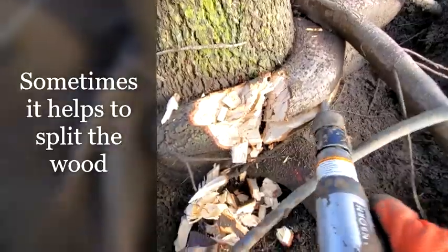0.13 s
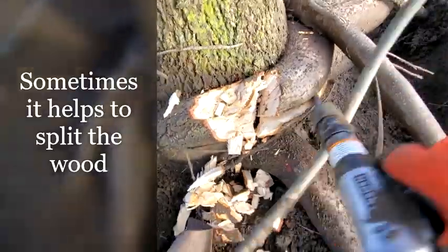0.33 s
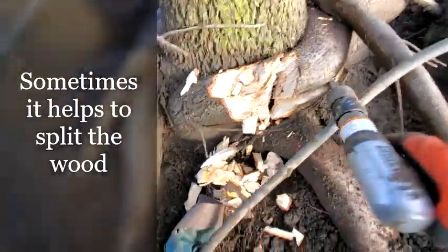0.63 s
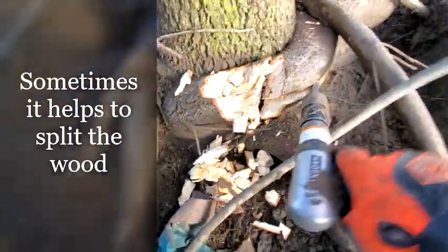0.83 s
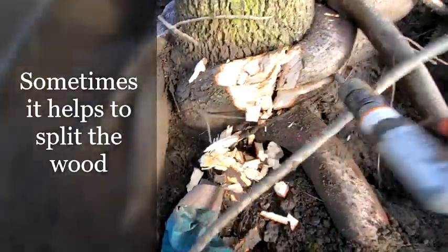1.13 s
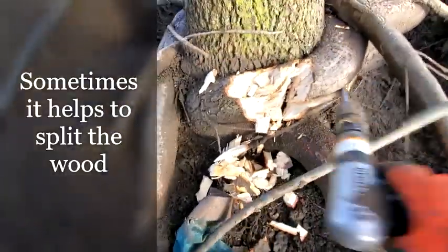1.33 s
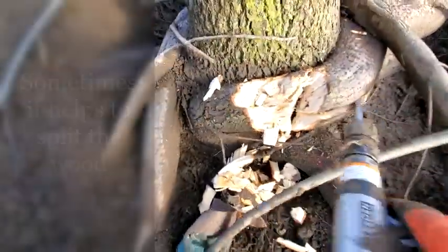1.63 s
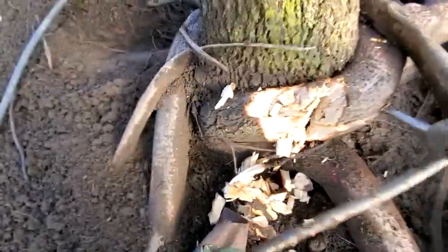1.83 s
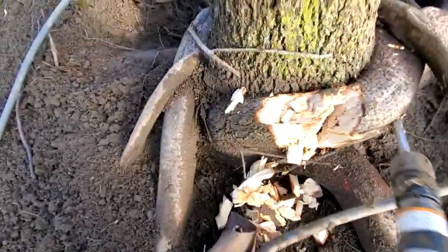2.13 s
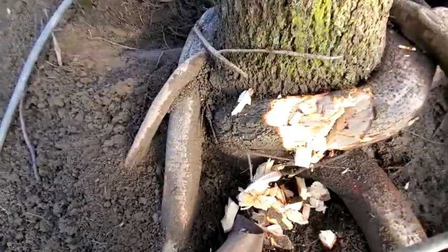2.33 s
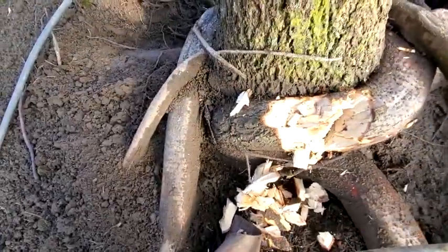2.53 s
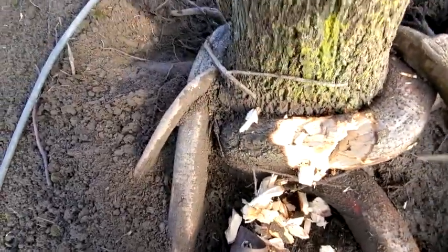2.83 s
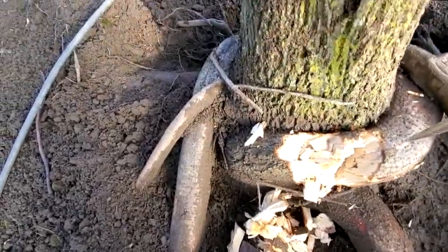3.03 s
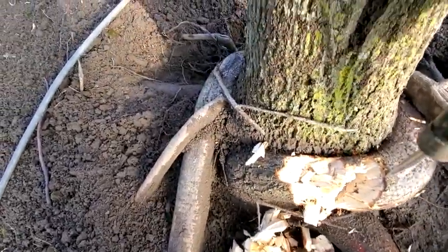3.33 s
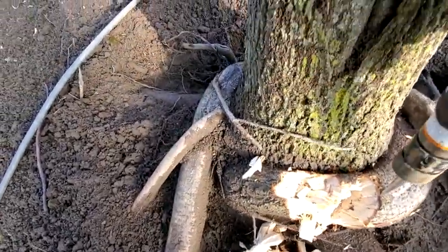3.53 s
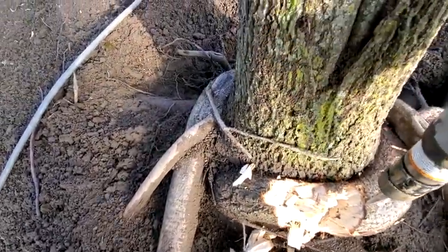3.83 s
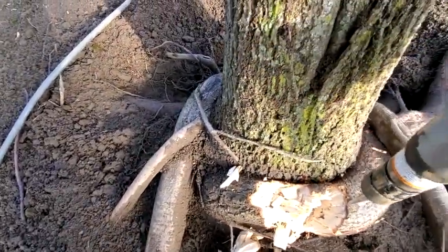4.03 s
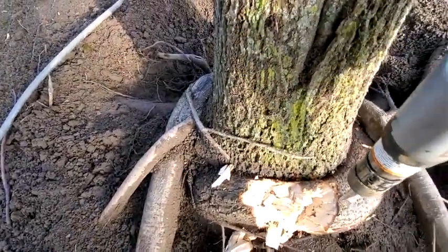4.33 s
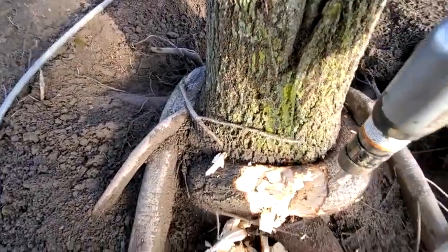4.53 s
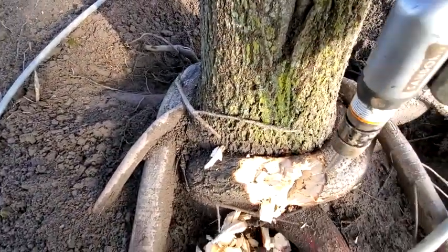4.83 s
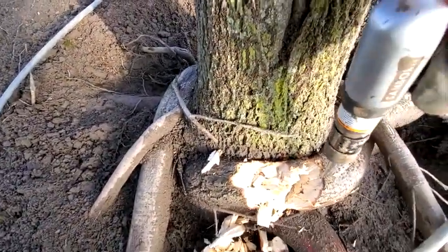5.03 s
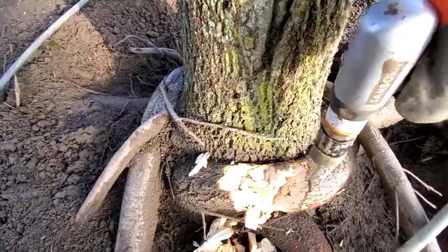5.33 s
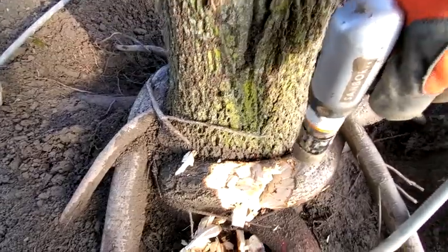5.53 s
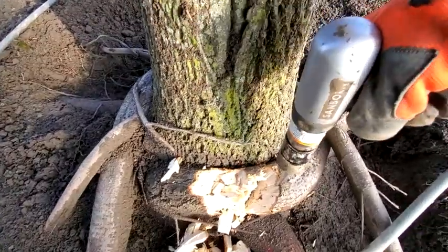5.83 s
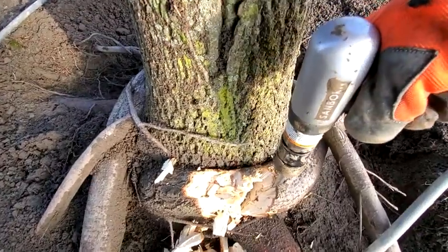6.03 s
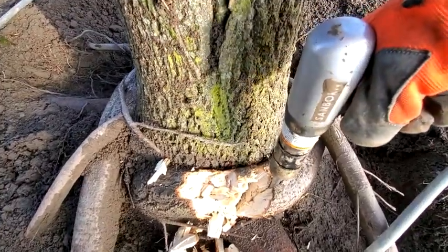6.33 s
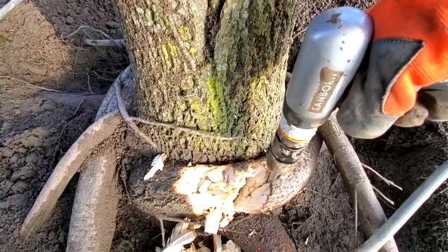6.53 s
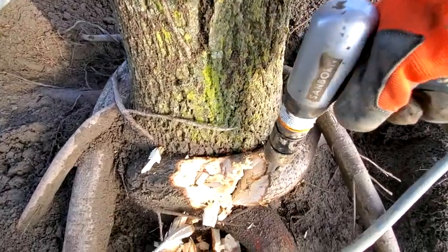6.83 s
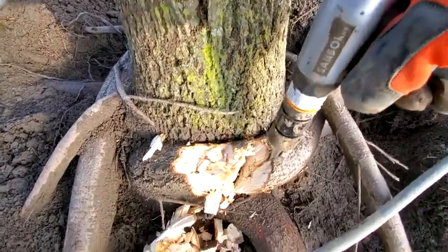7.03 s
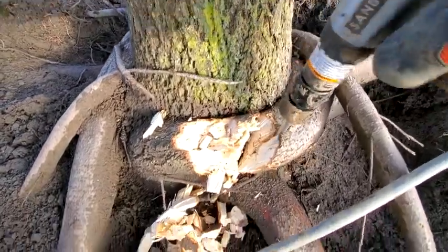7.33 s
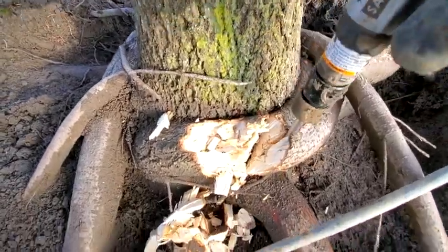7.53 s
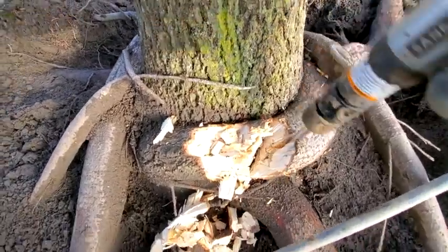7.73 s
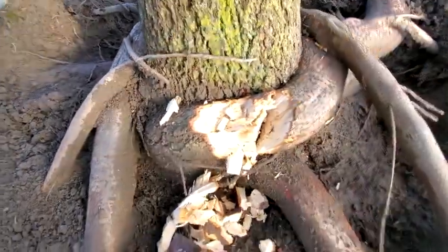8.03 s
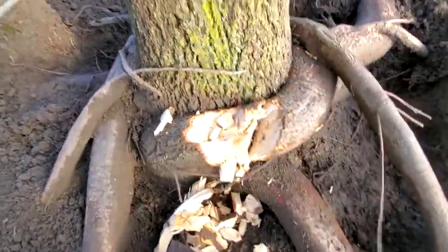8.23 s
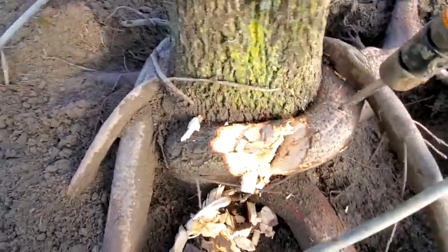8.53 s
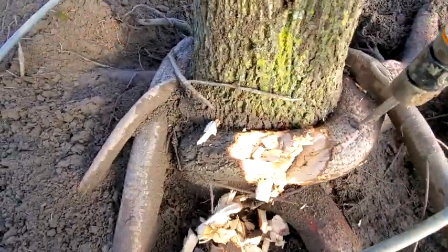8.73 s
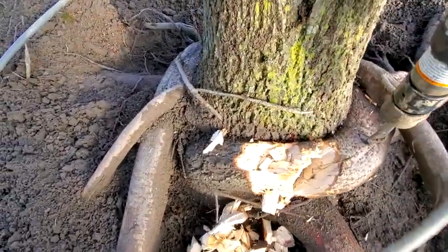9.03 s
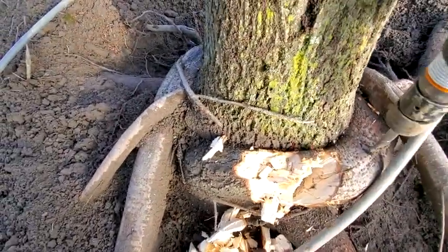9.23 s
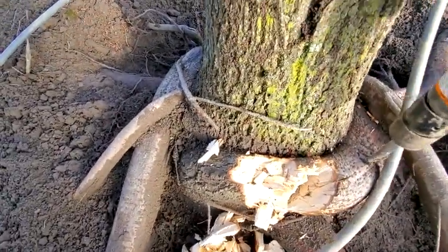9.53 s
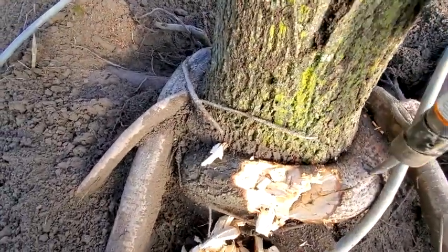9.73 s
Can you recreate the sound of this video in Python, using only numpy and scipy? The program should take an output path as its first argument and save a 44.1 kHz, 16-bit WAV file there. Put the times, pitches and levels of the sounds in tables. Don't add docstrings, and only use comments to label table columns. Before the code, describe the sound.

A close compressor hums and whines; a brief chisel burst, then a long hammering run into wood, a clattering release and another burst.

```python
import sys
import numpy as np
from scipy import signal
from scipy.fft import rfft, irfft, next_fast_len
from scipy.io import wavfile

SR = 44100
rng = np.random.default_rng(int(sys.argv[2]) if len(sys.argv) > 2 else 0)


def ratio_of_db(decibels):
    return 10 ** (np.asarray(decibels, float) / 20)


def master(y):
    cut = np.clip(np.atleast_2d(y).T, -1, 1)
    pcm = np.round(cut * 32767)
    wavfile.write(sys.argv[1], SR, pcm.astype(np.int16))


N = 436590

# t/s, turning rate/Hz
SHAFT = [(0, 55.98), (2, 56.08), (5.5, 56.17), (8.2, 56.06), (9.9, 56.15)]
# f/Hz, wander/Hz, level/dB re drone
GEAR_TONES = [(219, 4.0, -21), (168, 3.0, -28), (565, 2.0, -26.5), (1130, 2.5, -31.5), (995, 5.0, -35)]
# f/Hz, width/Hz, level/dB re drone, change when turned away/dB
HOLLOWS = [(977, 53, -29, 1), (176, 140, -19.5, -0.9), (1906, 100, -37, 7), (2040, 310, -26.5, -4.5)]
# t/s, level/dB
DRONE = [(0, -19.5), (.65, -20.5), (.8, -19), (1.08, -12.5), (1.4, -14), (1.8, -12.5), (4.64, -12.5),
         (4.69, -24), (5.2, -28), (7.05, -29), (7.14, -22.5), (7.27, -21.5), (7.85, -22), (8.15, -21.5),
         (8.55, -12), (9.63, -12), (9.7, -36), (9.9, -31)]
# t/s, level/dB re drone, turned/0-1
DRAUGHT = [(0, -22, 0), (.3, -22, 0), (1.1, -21, 0), (1.4, -21.5, 0.04), (2.5, -21, 0), (2.9, -21.5, 0.5),
           (3.3, -25, 0.68), (4.64, -25.5, 0.97), (7.14, -24.5, 0.1), (7.5, -24, 0.03), (8.2, -20.5, 0.04),
           (8.7, -23.5, 0.28), (9.9, -24.5, 0.17)]
# t/s, level/dB
WHINE = [
    [(0, -57), (.34, -53.5)],
    [(.53, -66), (1.05, -54), (1.3, -58), (1.85, -51.5), (2.45, -58), (3.1, -49.5), (3.55, -47.5),
     (3.8, -43.5), (3.95, -51), (4.15, -47), (4.63, -49.5)],
    [(7.34, -63), (7.5, -58), (7.82, -57), (7.9, -61), (8.12, -63), (8.23, -53), (8.4, -54.5), (8.7, -50),
     (9.0, -56.5), (9.63, -52)],
]
# t/s, squeak/dB re drone, throb of the whine/dB
REED = [(0, -28, 2), (2.8, -28, 2), (3.4, -26, 1.5), (3.8, -25, .8), (3.95, -27, 2.5), (4.1, -23, 5),
        (4.35, -22, 2.5), (4.45, -27, 2), (4.6, -24, 2.5), (7.3, -28, 1.5), (7.8, -30, 1.5), (7.95, -20, 3),
        (8.05, -28, 3), (8.3, -25, 2), (8.7, -27, 4.5), (8.95, -29, 2), (9.9, -29, 2.5)]
# f/Hz, level/dB per Hz
RUMBLE = [(76, -15), (130, -14), (163, -6.5), (227, -13.5), (435, -28), (560, -20), (726, -23),
          (987, -24.5), (1200, -40), (1560, -76), (2640, -120)]
RUSH = [(590, -0.5), (1000, -5), (1150, 5.5), (1190, 0.5), (1410, 4), (2060, -4), (2810, 0), (3100, -4.5),
        (4440, -5.5), (7000, -18.5), (9100, -53), (15400, -120)]
HISS = [(3240, 0.5), (5500, 1.5), (6890, -4), (7460, -5.5), (9180, -1), (13700, -4.5), (15100, -3),
        (15800, -19)]
# f/Hz, width/Hz
GROUND_DIPS = [(1550, 1360), (1186, 140)]
# f/Hz, level/dB, t60/s
RATTLE = [(2510, 6, 0.0021), (4100, -20, 0.01), (5300, 5.5, 0.0044), (8700, 6, 0.0039)]
# t/s, peak level/dB
GRIT = [(0.3508, -23), (0.82, -22), (1.1677, -29), (2.402, -17), (.397, -27), (.403, -19), (0.407, -24),
        (3.516, -24), (3.525, -27), (4.6555, -19), (4.6584, -8.5), (4.6615, -13), (7.0764, -25),
        (7.1063, -7), (7.431, -32), (7.46, -29), (7.481, -28), (7.883, -24.5), (7.9824, -37),
        (8.049, -18.5), (8.064, -23), (9.640, -11), (9.644, -8), (9.6482, -18)]
# t/s, peak level/dB, centre f/Hz
CHIPS = [(.843, -35, 13600), (1.325, -28.5, 9600), (2.386, -34, 7940), (3.4355, -36, 11000),
         (3.4834, -27.5, 10000), (3.512, -41, 2100), (3.522, -38, 2600), (3.533, -28.5, 5100),
         (3.485, -36, 15500), (3.549, -36, 9050), (7.116, -33, 11600), (7.459, -35, 9050),
         (7.974, -35.5, 8500), (8.08, -27, 13900), (8.182, -35.5, 9090), (8.503, -30, 9650),
         (9.048, -36, 8750), (9.643, -19, 9650)]
# t/s, peak level/dB, f/Hz
THUDS = [(.001, -27, 300), (.409, -14.5, 225), (.444, -16, 225), (.486, -16, 260), (4.641, -17, 245),
         (4.657, -18, 245), (7.104, -22, 245), (7.947, -25, 340), (7.957, -26, 250), (9.64, -18, 245)]
# multiple of its pitch, level/dB, t60/s
THUD_PARTIALS = [(1, 4, 0.03), (3.1, -2.5, 0.013)]
# f/Hz, level/dB, t60/s
HOLDER = [(1300, -26, .006), (2320, -12, 0.015), (3550, 5, 0.009), (4800, -17, 0.0054), (6100, -2, 0.0076),
          (6400, -14, 0.0045), (9500, -4, .005), (11500, -16, .004)]
# t/s, exhaust air level/dB, blade depth/0-1
TRIGGER = [
    [(.39, -35, 0.3), (.405, -31, 1), (.44, -40, 1), (.495, -41, 0.8)],
    [(4.635, -35, 0.2), (4.66, -30.5, 0), (4.85, -31, 0.22), (5.1, -34.5, 0.15), (5.35, -35, 0.76),
     (6.4, -33.5, 0.89), (6.7, -32, 0.98), (7.0, -33.5, 1), (7.1, -38, 1)],
    [(9.64, -27, 1), (9.67, -31, 0.8), (9.75, -37, 0.54), (9.84, -34, 0.3), (9.9, -34.5, 0.9)],
]
# t/s, level/dB
HALF_OPEN = [
    [(.372, -32), (.385, -27), (.44, -39), (.5, -44), (.525, -48)],
]
# f/Hz, level/dB per Hz
EXHAUST = [(410, 6.5), (700, 0.5), (1280, -4.5), (1580, -9.5), (1970, -7), (2240, -5), (2990, 3.5),
           (3280, 2), (4380, 2), (5400, 1.5), (5840, -1.5), (8100, -6), (11000, -6.5), (16000, -17)]
# f/Hz, width/Hz, level/dB re exhaust
OPEN_CUT = (4600, 980, 0)
# t/s, blow force/dB, lean on handle/dB, freedom of shank/dB, grip of wood/dB
HAND = [
    [(.41, -18, 4, -15, 3), (.49, -21, 4.5, -9, 7)],
    [(4.67, -16.5, -2.5, 9, 1), (4.8, -13.5, -1.5, 1, 1), (4.95, -14, -1.5, -1, 2.5), (5.2, -17, 1.7, 4, 5),
     (5.5, -16.5, 0.5, -1, 0.9), (5.8, -18, 2.5, 2, 1), (5.97, -14, 1, -2, -1), (6.15, -18, 3, 2.1, 1),
     (6.4, -23, 5, 1, 6.5), (6.55, -19, 4.5, 1, 3), (6.68, -17, 4.5, -1, 3), (6.82, -20, 3.5, 4, 3.5),
     (6.93, -20.5, 4.5, 1.1, 5), (7.06, -19, 3.5, -6, 3)],
    [(9.65, -19, -5, 23, 7), (9.73, -21.5, -2, 18.5, 11), (9.88, -21.5, -0.5, 14, 13)],
]
# t/s, crack level/dB, clank level/dB, both re hand
BLOWS = [(0.4149, 3.0, -8), (0.4489, 1, -1), (0.4906, 2.0, -3), (4.6706, 3, 0.5), (4.6984, -1, 4),
         (4.7269, -4.5, -9), (4.7545, 0, -2.0), (4.7821, -3, 7), (4.8111, 0.5, 0), (4.8393, 1.5, 6),
         (4.8675, -5, -3), (4.8949, 0.5, 1.5), (4.9238, 2.5, 2), (4.9529, -1, 2), (4.9815, -2.0, 2),
         (5.0117, -4, -4.0), (5.0406, -2.5, 2), (5.0689, 1, 3.5), (5.098, -1, 2), (5.1273, -0.5, 3.0),
         (5.1563, -5, -6), (5.1858, -4, 0), (5.215, -3, 1), (5.2446, 0, 1.5), (5.2742, 0.5, 2),
         (5.3042, 1.0, 1), (5.3338, 2.5, 3), (5.3637, 0, -2), (5.394, 1.5, 3.5), (5.4239, -0.5, -1.5),
         (5.4544, -0.5, 1.0), (5.4844, -3, -0.5), (5.5146, 1, -1.5), (5.5446, 2, 2), (5.5747, 2, 3.5),
         (5.6049, -2, -2.0), (5.6351, -0.5, 2), (5.6653, 2.0, 1.5), (5.6958, 1.5, 3),
         (5.726, 3.5, 4.5), (5.7565, -2, 1.5), (5.7868, 1, 2.5), (5.8171, -1.0, 0.5),
         (5.847, -1.0, 0), (5.8775, -2, 3),
         (5.9082, 0, 2), (5.9382, 2.5, 4), (5.9687, -1.5, 2.5), (5.9994, 0.5, 2.5), (6.0292, 0.0, 1.5),
              (6.06, 1.5, 1.0), (6.0906, -3, -5), (6.1206, 3.5, 2), (6.1513, 1, 1.5), (6.1821, -2.0, -3.5),
              (6.2131, 0.0, -2), (6.2434, 4, -0.0), (6.2739, 2, -2.5), (6.3047, 3, -0.5), (6.3353, 0.5, -5),
              (6.3655, 2, -2.0), (6.3961, -0.5, -6), (6.4267, 1, -5), (6.4571, 2, -2), (6.4875, -2.5, -0.5),
              (6.5183, -1, 0.0), (6.5484, 0.5, 0), (6.5781, -2.5, 0.5), (6.6084, 1, 2.5),
              (6.6387, -0.5, 2.5), (6.6682, -0.5, 2), (6.6981, -0.5, 0.5), (6.7282, 2.0, 0),
              (6.7584, 0.5, 0.0), (6.7893, -3, -6), (6.8195, -0.0, 1.5), (6.8498, 1.5, 2), (6.88, 2.5, 1),
              (6.9105, 3.5, 4), (6.9404, 0, 2), (6.9702, 2, 0.5), (7.001, 1.5, -0.0), (7.0311, 5, 2.5),
              (7.0623, 4.0, 4.5), (9.6523, 0, -10), (9.6777, 3.5, -1), (9.7015, -5, -4), (9.7264, -1, -2),
              (9.7507, 2, 0), (9.7752, -3, -2), (9.8006, -0.0, -10), (9.8256, 2, -3), (9.8506, 2, -1),
              (9.8752, -1, -1)]
OWN_SCATTER_DB = [.2, .2, .6, 1.2]
LEAN_SHARE = [0.13, 1.04, 0.21, 1.1]
# f/Hz, level/dB per Hz
CRACK = [(4500, 4.5), (6000, 3), (7400, -1), (8800, 7.5), (10600, 7.5), (11300, 4.5), (14000, 4.5),
         (16000, -28)]
CLANK = [(700, -65), (1100, 4), (1600, 5), (2300, 14), (3000, 10), (4100, 8.5), (5200, -10), (6500, 7)]
# f/Hz, width/Hz
CLANK_GAP = (2110, 1340)
# delay after blow t/s, level/dB
REBOUNDS = [(.0022, -6), (.0052, -15)]
# f/Hz, level/dB, t60/s
CHISEL = [(15800, 15, 0.0058), (14900, -11, 0.01), (15100, -8, .005)]
# f/Hz, level/dB, t60/s, share of the lean
BARREL = [(2180, -32.5, 0.0096, 8), (2770, -23, 0.0048, -6), (4280, -42, 0.024, -2), (5550, -43, 0.013, 7),
          (5800, -10.5, 0.031, 1.06)]
# f/Hz, level/dB, t60/s, moment of best seat t/s, span of that seat/s
ROOT = [(608, 5.8, 0.03, 6.27, 1.17), (343, 1.5, 0.064, 5.74, 0.94), (753, -6, 0.027, 5.86, 1.2),
        (500, 0.5, 0.034, 6.15, 0.22), (988, 1, 0.041, 7.07, 0.52), (383, -11.5, 0.042, 6, 0.49),
        (1257, -11.5, 0.085, 5.7, 0.31), (1170, -12, 0.059, 6.45, 0.23), (1635, 1, 0.038, 6.4, 0.57),
        (2380, -11, 0.042, 5.9, 0.45)]
# f/Hz, level/dB, t60/s
ROOT_LOOSE = [(486, -4.5, 0.02), (249, -12, 0.097), (324, -8.5, 0.067), (590, -22, 0.037)]
# f/Hz, share
LIKENESS = [(60, 0.64), (250, 0.71), (600, 0.77), (1500, 0.56), (4000, 0.082), (10000, 0.27)]
# f/Hz, level/dB
MUFFLE = [(60, -1.5), (120, -2.14), (200, -2.8), (400, -3.5), (750, -12), (1300, -9), (2100, -2.5),
          (2800, -12.5), (4000, -4), (5500, -14.5), (7000, -26.5), (8000, -76), (9500, -35), (12600, -23.5),
          (15500, -82)]
# f/Hz, lag/s
PORT_LAG = [(56, .00048), (112, .00066), (220, .00054), (330, .00054), (565, .0005), (800, .00043),
            (2000, .00043)]


def rms_one(x):
    return x / np.sqrt(np.mean(x ** 2) + 1e-20)


def in_time(tables, silent=False):
    rows = []
    for table in tables:
        if silent:
            off = [-90] * (len(table[0]) - 1)
            rows += [[table[0][0] - .012, *off], *table, [table[-1][0] + 0.047, *off]]
        else:
            rows += list(table)
    s, *columns = np.transpose(rows)
    return [np.interp(np.arange(N) / SR, s, c) for c in columns]


def at_bins(points, size):
    hz = np.maximum(np.arange(size // 2 + 1) * SR / size, 1)
    table_hz, value = np.array(points).T[:2]
    return np.interp(np.log(hz), np.log(table_hz), value)


def colour(x, spectrum):
    size = next_fast_len(N + 2048)
    (low_hz, low_db), (high_hz, high_db) = spectrum[0], spectrum[-1]
    ends = [(low_hz / 2, low_db - 30), *spectrum, (high_hz * 1.3, high_db - 40)]
    gain = rms_one(ratio_of_db(at_bins(ends, size)))
    return irfft(rfft(x, size) * gain, size)[..., :N]


def noise_pair():
    size = next_fast_len(N)
    left, other = rfft(rng.standard_normal((2, size)))
    alike = np.clip(at_bins(LIKENESS, size), 0, 1)
    right = alike * left + np.sqrt(1 - alike ** 2) * other
    return irfft([left, right], size)[:, :N]


def drift(rate):
    r = np.exp(-80 * np.pi * rate / SR)
    slow = signal.lfilter([1], [1, -2 * r, r * r], rng.standard_normal(N // 40 + 2002))[2000:]
    return np.interp(np.arange(N) / 40, np.arange(len(slow)), rms_one(slow))


def clicks(at_s, db):
    out = np.full(N, 1e-18)
    i = np.round(np.asarray(at_s) * SR).astype(int)
    np.add.at(out, np.clip(i, 0, N - 1), ratio_of_db(db))
    return out


def ring(x, hz, t60):
    r, w = ratio_of_db(-60 / (t60 * SR)), 2 * np.pi * hz / SR
    return signal.lfilter([0, np.sin(w)], [1, -2 * r * np.cos(w), r * r], x)


def swell(x, rise_s, fall_s):
    a, b = np.exp(-1 / (rise_s * SR)), np.exp(-1 / (fall_s * SR))
    fall = signal.lfilter([1 + rise_s / fall_s], [1, -b], x)
    return signal.lfilter([1 - a], [1, -a], fall)


def narrow(hz, width_hz):
    return rms_one(ring(noise_pair(), hz, 1.56 / width_hz))


def tone(hz, wander_hz, flutter_db):
    level = np.sqrt(2) * ratio_of_db(flutter_db * drift(3.8))
    return level * np.sin(2 * np.pi * np.cumsum(hz + wander_hz * drift(23.2)) / SR)


def dip(x, hz, width_hz):
    return x - .78 * signal.lfilter(*signal.iirpeak(hz, hz / width_hz, SR), x)


def machine_drone(turn, turned):
    second_db, second_lag = -5.5, 2.43
    out = np.cos(turn) * ratio_of_db(4.0 + 0.16 * drift(13.0))
    out = out + np.cos(2 * turn - second_lag) * ratio_of_db(3.5 + second_db + 0.06 * drift(8.5))
    for hz, wander_hz, db in GEAR_TONES:
        away_db = -8 * turned * (hz > 400)
        out = out + ratio_of_db(db + away_db) * tone(hz, wander_hz, flutter_db=1.7)
    for hz, width_hz, db, away_db in HOLLOWS:
        out = out + ratio_of_db(db + away_db * turned) * narrow(hz, width_hz)
    unrest = ratio_of_db(.8 * drift(12))
    out = out + ratio_of_db(-19.5) * colour(noise_pair(), RUMBLE) * unrest
    squeak_db = in_time([REED])[0]
    chirps = (0.2 + np.maximum(np.cos(turn / 2), 0) ** 2) * ratio_of_db(1.8 * drift(6.2))
    out = out + ratio_of_db(squeak_db) * chirps * narrow(4410, 210.0)
    bass = colour(noise_pair(), [(35, 4), (75, 4.5), (95, 12.5), (130, -4.5)])
    return out + ratio_of_db(-16.5) * bass


def machine_air(turn, turned, drone_db, draught_db):
    leak_db, leak_follows = -30.5, 1.68
    firing = in_time(TRIGGER, silent=True)[0] > -60
    hiss_db = drone_db + leak_db + leak_follows * (draught_db - draught_db.mean())
    hiss_db = hiss_db + 2 * firing + 4 * turned
    breath = ratio_of_db(0.72 * np.cos(turn + 0.29) + 0.72 * drift(10.3))
    rush = colour(noise_pair(), RUSH)
    rush = (1 - turned) * dip(rush, *GROUND_DIPS[0]) + turned * dip(rush, *GROUND_DIPS[1])
    hiss = colour(noise_pair(), HISS)
    return breath * (ratio_of_db(drone_db + draught_db + 5) * rush + ratio_of_db(hiss_db + 5.0) * hiss)


def machine_whine(turn):
    whine_hz, swing = 3957, .7
    whine_db, throb_db = in_time(WHINE, silent=True)[0], in_time([REED])[1]
    bend = 2 * np.pi * np.cumsum(whine_hz + 5.54 * drift(21)) / SR + swing * np.cos(turn / 2)
    return np.sin(bend) * ratio_of_db(whine_db + 17.5 + 1.4 * drift(30) + throb_db * np.cos(turn / 2))


def compressor():
    drone_db = in_time([DRONE])[0]
    draught_db, turned = in_time([DRAUGHT])
    turned = np.clip(turned, 0, 1)
    turn = 2 * np.pi * np.cumsum(in_time([SHAFT])[0]) / SR
    drone = ratio_of_db(drone_db) * machine_drone(turn, turned)
    return drone + machine_air(turn, turned, drone_db, draught_db) + machine_whine(turn)


def rattle():
    born = rng.random(N) < 260 / SR
    sizes = born * ratio_of_db(1.57 * np.minimum(rng.exponential(1, N), 4)) * rng.choice([-1, 1], N)
    dealt = rng.integers(0, len(RATTLE), N)
    rings = 0
    for k, (hz, db, t60) in enumerate(RATTLE):
        rings = rings + ratio_of_db(db) * ring(sizes * (dealt == k) + 1e-18, hz, t60)
    return ratio_of_db(in_time(TRIGGER, silent=True)[0] + 10) * rings


def drops():
    drop_s, bounce_s, shrink = 7.2077, .0373, .56
    drop_db, first_loss_db, bounce_loss_db = -11, 5.5, 5
    k = np.arange(5)
    s = drop_s + bounce_s * (1 - shrink ** k) / (1 - shrink)
    return s, drop_db - first_loss_db * (k > 0) - bounce_loss_db * k


def touches():
    grit = [(s, db, 5340, 0.095) for s, db in GRIT]
    chips = [(*row, .72) for row in CHIPS]
    scuffs = [(s, db - 3.5, 5450, 0.25) for s, db in zip(*drops())]
    return grit + chips + scuffs


def ticks():
    snap_s = .0006
    out, white = np.zeros((2, N)), noise_pair()
    age = np.arange(600) / (snap_s * SR)
    fade = np.e * age * np.exp(-age) + 0.16 * np.exp(-age / 22.0)
    for s, db, hz, pitched in touches():
        i = round(s * SR)
        snap = white[:, i:i + 600] * fade
        body = 0.4 * (1 - pitched) ** 2 * snap + pitched * ring(snap, hz, 11.6 / hz)
        out[:, i:i + 600] += ratio_of_db(db + 7.5) * body
    for s, peak_db, hz in THUDS:
        for multiple, db, t60 in THUD_PARTIALS:
            out = out + ratio_of_db(db) * ring(clicks(s, peak_db), multiple * hz, t60)
    return out


def holder():
    freed_s, freed_db, light_touch_db = 7.1068, -7.5, -12
    s, db = drops()
    s, db = np.r_[freed_s, s + .0008], np.r_[freed_db, db]
    light = np.arange(6) > 1
    out = 0
    for hz, mode_db, t60 in HOLDER:
        outer = (hz < 4000) | (hz > 8000)
        level_db = db + mode_db - 2.5 + light_touch_db * light * outer + 1.2 * rng.standard_normal(6)
        out = out + ring(clicks(s, level_db) - clicks(s - .0007, level_db - 20), hz, t60)
    return out


def exhaust(s):
    air_db = in_time(TRIGGER, silent=True)[0]
    depth = np.clip(in_time(TRIGGER)[1], 0, 1)
    stroke = np.clip(np.diff(s, append=s[-1] + 0.018), .02, .034)
    fore, back = s - 0.07 * stroke, s + 0.454 * stroke
    spit_db, puff_db, pop_db, push_db = (rng.standard_normal((len(s), 4)) * [2.0, 1.2, .8, 1.0]).T
    spit = swell(clicks(fore, -0.5 + spit_db), 0.00032, 0.0032)
    puff = swell(clicks(back + 0.00068, 6.5 + puff_db), 0.00077, 0.00077) / (0.0019 * SR)
    puff = swell(puff, 0.0016, 0.002)
    air = colour(noise_pair() * (.62 + spit + .4 * puff), EXHAUST) * ratio_of_db(1.9 * drift(79))
    air = air + colour(noise_pair() * .16 * puff, CLANK)
    air = air + ratio_of_db(-2 - 6.0) * depth ** 2 * colour(noise_pair(), RUSH)
    bright = swell(clicks(back + .0012, 6.5 + spit_db), 0.0012, 0.0035) * ratio_of_db(-4 * depth)
    air = air + .5 * colour(noise_pair() * bright, CRACK)
    hz, width_hz, whistle_db = OPEN_CUT
    air = air + ratio_of_db(whistle_db - 4.0) * (1 - depth) * (0.73 + 1.0 * puff) * narrow(hz, width_hz)
    pop = clicks(fore, 8.0 + pop_db)
    push = ring(pop, 283, 0.013) + 0.16 * ring(pop, 2070, 0.0091) + 0.1 * ring(pop, 740, 0.0067)
    push = push + ring(clicks(back, 6.5 + push_db), 168, 0.034)
    half_open = ratio_of_db(in_time(HALF_OPEN, silent=True)[0]) * colour(noise_pair(), CRACK)
    return ratio_of_db(air_db + 9.5) * (air + push) + half_open


def blows():
    shared_scatter_db, knock_follows, shank_follows = .2, 0.67, .6
    s, crack_db, clank_db = np.transpose(BLOWS)
    at, *hand = np.transpose(sum(HAND, []))
    force_db, lean_db, free_db, grip_db = [np.interp(s, at, h) for h in hand]
    chance = rng.standard_normal((len(s), 6))
    db = (force_db + shared_scatter_db * chance[:, 4])[:, None]
    db = db + np.outer(lean_db, LEAN_SHARE)
    db = db + chance[:, :4] * OWN_SCATTER_DB
    knock_db = grip_db + knock_follows * clank_db
    shank_db = free_db + shank_follows * crack_db
    db = db + np.transpose([crack_db, clank_db, knock_db, shank_db])
    return s, *db.T, lean_db


def repeating(s):
    share = .62
    white = noise_pair()
    near = np.round(s * SR).astype(int)[:, None] + np.arange(-110, 900)
    white[:, near] = signal.lfilter([np.sqrt(1 - share ** 2)], [1, -share], white[:, near], axis=1)
    return white


def steel(s, crack_db, clank_db, depth):
    run_up_s, run_up_db = .0013, -4
    crack = swell(clicks(s, crack_db + 5.5), 0.00065, 0.00062)
    crack = crack + swell(clicks(s, crack_db - 7.5), 0.0017, .0035)
    crack = crack + swell(clicks(s - run_up_s, crack_db + run_up_db), run_up_s, run_up_s)
    clank = swell(clicks(s, clank_db + 1.5), 0.00089, 0.00091)
    clank = clank + swell(clicks(s + 0.0035, clank_db - 10.0), 0.0013, 0.003)
    for late_s, db in REBOUNDS:
        clank = clank + depth * swell(clicks(s + late_s, clank_db + db), 0.00054, 0.00062)
    clank = clank + swell(clicks(s - run_up_s, clank_db + run_up_db), run_up_s, run_up_s)
    bright = colour(repeating(s) * crack, CRACK)
    return bright + dip(colour(repeating(s) * clank, CLANK), *CLANK_GAP)


def shank(s, shank_db, depth):
    hit = swell(clicks(s, shank_db - 19.5), 0.00025, 0.00055)
    after = ratio_of_db(-8 * depth) * swell(clicks(s, shank_db - 38), .001, 0.039)
    jolt = noise_pair() * (hit + after)
    return sum(ratio_of_db(db) * ring(jolt, hz, t60) for hz, db, t60 in CHISEL)


def barrel(s, crack_db, clank_db, lean_db):
    own_db = 1.7 * rng.standard_normal((len(s), len(BARREL)))
    out = 0
    for own, (hz, db, t60, share) in zip(own_db.T, BARREL):
        level_db = (crack_db + clank_db) / 2 + 0.6 + db + share * lean_db + own
        out = out + ring(clicks(s + 0.00059, level_db), hz, t60)
    return out


def root(s, knock_db, depth):
    seat_loss_db = 7.5
    knock = clicks(s - 0.0003, knock_db - 6.5) + clicks(s + 0.00126, knock_db - 3.0)
    knock = knock + clicks(s + 0.00209, knock_db - 7.5)
    now = np.arange(N) / SR
    wood = 0
    for hz, db, t60, best_s, span_s in ROOT:
        away = np.minimum(((now - best_s) / span_s) ** 2, 2)
        wood = wood + ring(knock * depth * ratio_of_db(db - seat_loss_db * away), hz, t60)
    for hz, db, t60 in ROOT_LOOSE:
        wood = wood + ratio_of_db(db) * ring(knock * (1 - depth), hz, t60)
    return wood


def strikes(strokes):
    s, crack_db, clank_db, knock_db, shank_db, lean_db = strokes
    depth = np.clip(in_time(TRIGGER)[1], 0, 1)
    metal = steel(s, crack_db, clank_db, depth) + shank(s, shank_db, depth)
    return metal + barrel(s, crack_db, clank_db, lean_db) + root(s, knock_db, depth)


def scene():
    strokes = blows()
    background = compressor() + rattle() + ticks() + holder()
    return background + exhaust(strokes[0]) + strikes(strokes)


def roll_off(x):
    return signal.sosfilt(signal.butter(12, 16990, fs=SR, output="sos"), x)


def record(dry):
    top_hz, bass_cut_hz = 15930, 26.4
    size = next_fast_len(N + 2048)
    hz = np.arange(size // 2 + 1) * SR / size
    right = ratio_of_db(at_bins(MUFFLE, size)) * np.exp(-2j * np.pi * hz * at_bins(PORT_LAG, size))
    top_cut = np.clip((top_hz - hz) / 120, 0, 1)
    bass_cut = hz ** 2 / (hz ** 2 + bass_cut_hz ** 2)
    ports = irfft(rfft(dry, size) * [np.ones_like(hz), right] * top_cut * bass_cut, size)[:, :N]
    mix = 1.202 * np.tanh(ports / 1.401)
    return roll_off(mix)


dry = scene()
out = record(dry)
master(out)
```